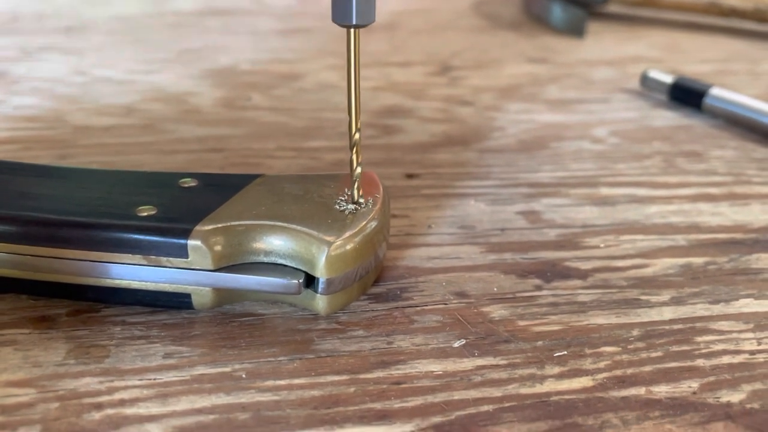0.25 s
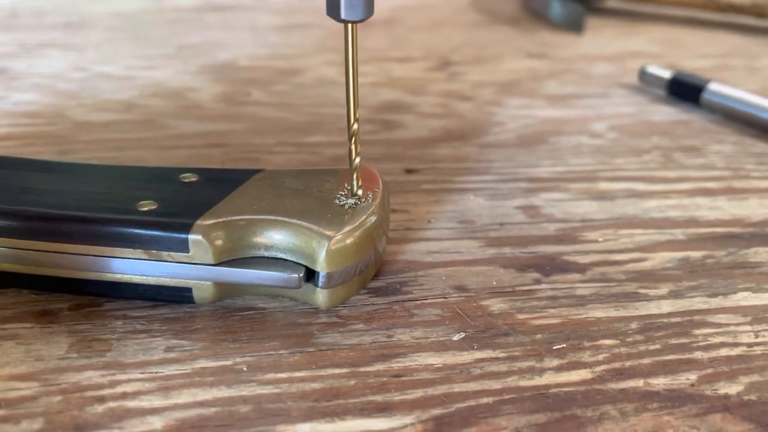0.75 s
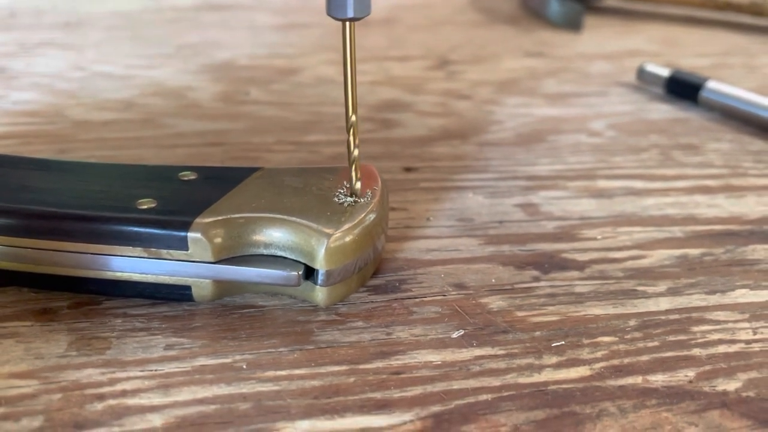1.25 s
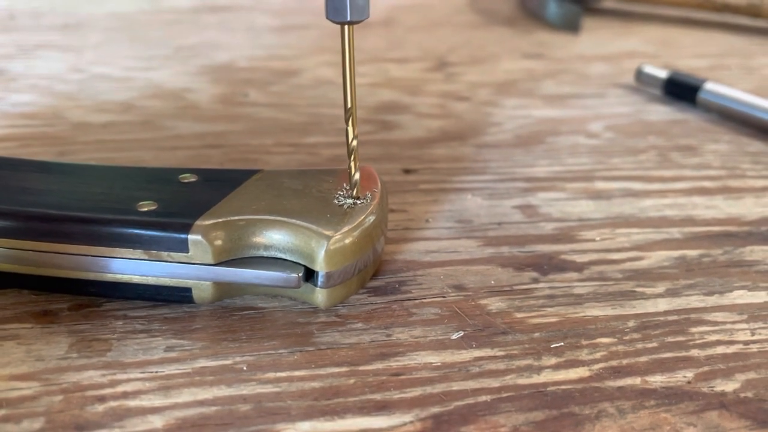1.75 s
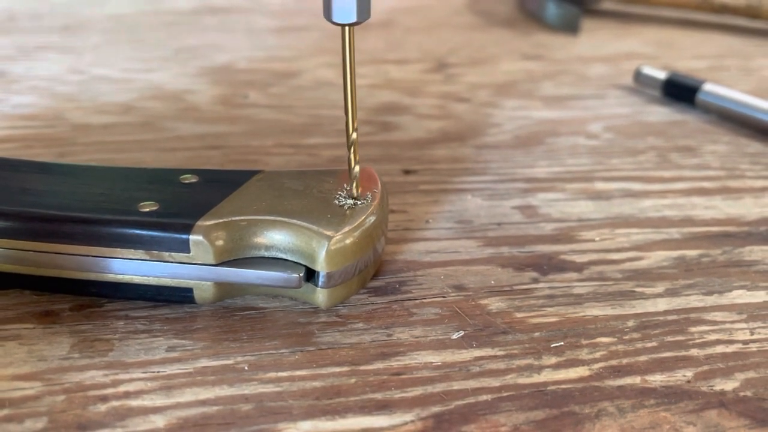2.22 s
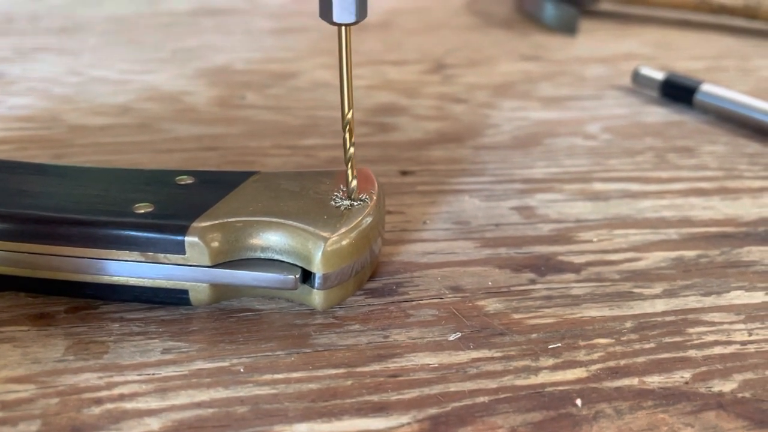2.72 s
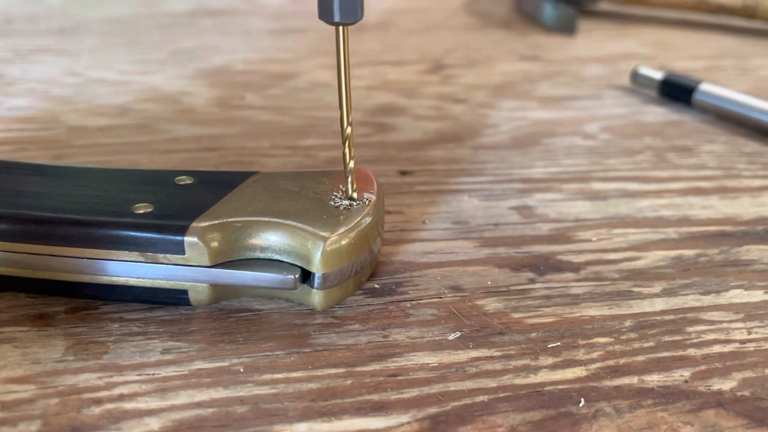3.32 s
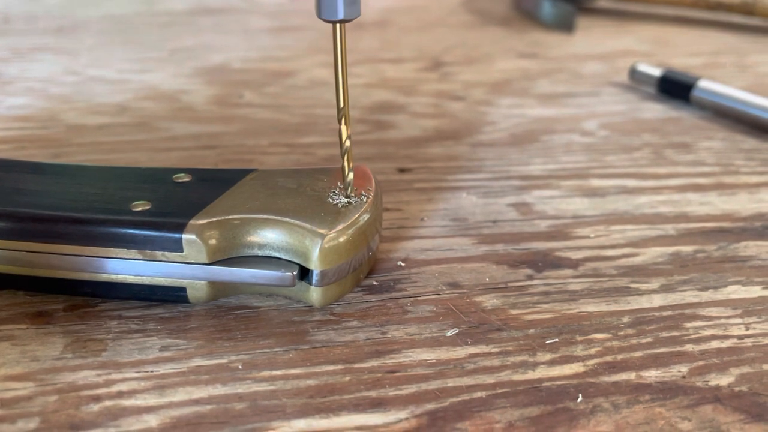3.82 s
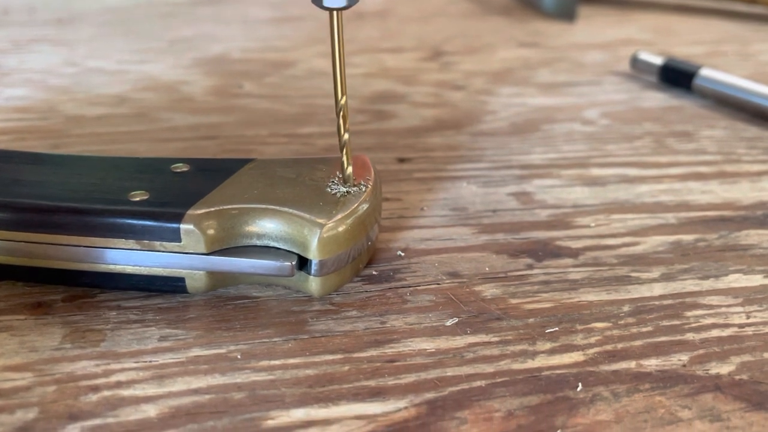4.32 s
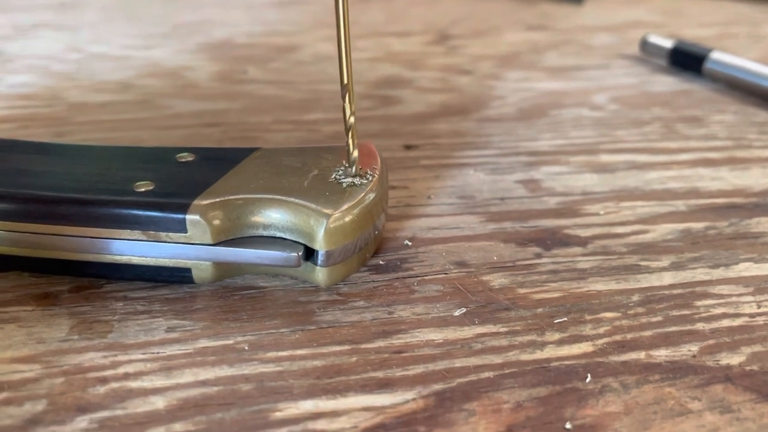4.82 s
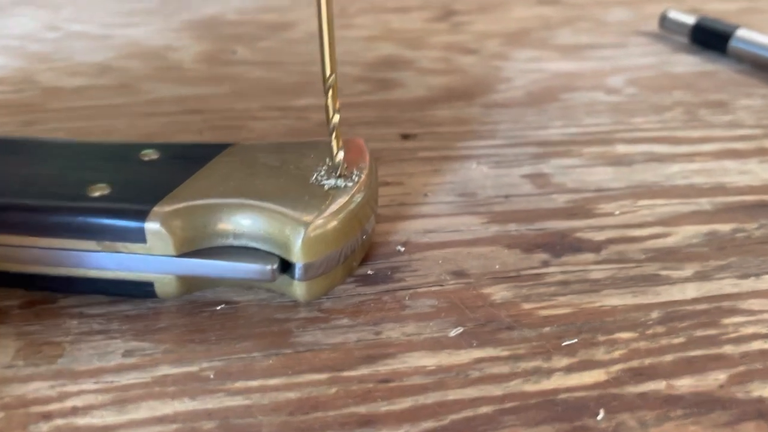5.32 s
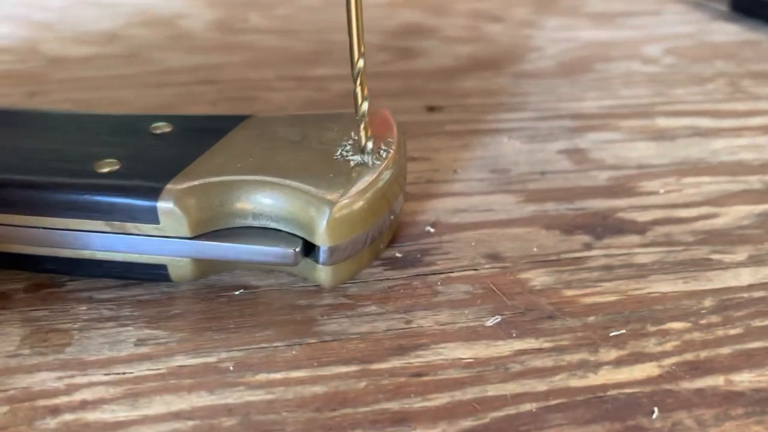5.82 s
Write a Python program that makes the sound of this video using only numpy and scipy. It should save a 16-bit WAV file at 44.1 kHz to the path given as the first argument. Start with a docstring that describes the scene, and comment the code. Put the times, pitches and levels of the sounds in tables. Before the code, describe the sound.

Heard very close in a small, quiet room, a handheld electric drill cuts metal in bursts of about half a second to a second. The whine swoops up, gear teeth rattle, and the bit rasps with short shuddering surges; then the pitch drops quickly and the clatter breaks into ticks. Faint room hum fills the gaps, with occasional bright chip snaps, soft knocks and tiny halting squeaks. The last pull is short.

```python
"""A cordless drill, already running, bores a thin bit into the brass end of a folding knife on a wooden bench.
It coasts down, then five more short pulls follow: the speed control whistles and the motor winds up,
its hum and gear tones climbing through clattering teeth while the bit scrapes and shudders in surges.
Let go, the motor brakes evenly to a stop; a few halts squeak, and now and then a chip snaps or the drive knocks.
Shaped noise and two low tones hold a small quiet room beneath it all, heard at two close microphone ports."""
import sys
import numpy as np
from scipy import signal
from scipy.fft import rfft, irfft, next_fast_len
from scipy.io import wavfile
from scipy.ndimage import uniform_filter1d

SR = 44100
rng = np.random.default_rng(int(sys.argv[2]) if len(sys.argv) > 2 else 0)


def master_out(mix):
    """Clip the mix to full scale and print it as 16-bit PCM to the path in sys.argv[1]."""
    frames = np.transpose(np.atleast_2d(mix))
    ceiling = np.clip(frames, -1, 1)
    pcm = np.round(ceiling * 32767).astype(np.int16)
    wavfile.write(sys.argv[1], SR, pcm)


N = 267246
TIME = np.arange(N) / SR

# trigger pulls, the first already under way: on [t/s], off [t/s], top speed [turns per s],
# wind-up time constant [t/s], coast to rest [t/s], then base levels before speed and trims:
# rattle [level/dB], scrape [level/dB], hum lift [level/dB], whistle [level/dB], whistle left over right [level/dB]
TRIGGER_PULLS = [ (-1.0, .068, 206, .17, .295, -31.2, -42.5, 3, -40, 1),
                 (.694, 1.38, 202.5, .15, .297, -31.3, -41.5, 0, -39, 0),
                 (1.858, 2.433, 199, .174, .255, -30.9, -41.7, 1, -39.5, -1),
                 (2.886, 3.866, 193.5, .157, .263, -31, -41.7, 0, -41, -2),
                 (4.233, 4.924, 191, .153, .26, -31, -42.3, 1.5, -40.5, -.5),
                 (5.649, 6.07, 201, .181, .26, -31, -42.4, 2.5, -38, 6)]
# motor and gear tones, before the housing: multiple of motor speed, level relative to the rattle gain [level/dB]
GEAR_TONES = [(1, -15), (3, -9), (4, -8), (6, -3.2), (8, -11), (9, -6), (12, -7.5), (15, -5.5), (20, -11)]
# swell of the motor hum through the drill body's resonances: pitch [f/Hz], level before each pull's lift [level/dB]
HUM_SWELL = [(100, -66), (220, -60), (260, -44), (295, -50), (330, -33.5), (355, -38), (375, -35.5),
             (392, -39.5), (415, -32)]
# broad colour of drill, knife and bench: [f/Hz], relative [level/dB]
BODY_COLOUR = [(40, -33), (90, -13.5), (140, -4.5), (250, -13), (450, -1.5), (1000, -2.5), (1900, 1),
               (2700, -4.2), (3200, -12), (5500, -19), (7500, -16), (11000, -18), (15000, -32)]
# resonances of drill, knife and bench: centre [f/Hz], width [f/Hz], lift [level/dB]
BODY_MODES = [(196.2, 21.3, 13), (262, 42.6, 18), (325.8, 93, 13), (407, 90, 8), (493, 35, 5.5),
              (553.6, 138, 6.5), (716, 129, 5), (871, 256, 7), (1185, 67, 5.5), (1570, 202, 7.7),
              (1728, 154, 5), (2496, 122, 5), (2812, 110, 5), (3505, 360, 5.5), (4696, 190, 7),
              (5200, 300, 2.5), (6500, 2700, 6.3)]
# surges of chatter near the bit's bending resonance, several as a gear tone sweeps through it:
# middle [t/s], pitch [f/Hz], rms at the top before the trim [level/dB]
CHATTER_SURGES = [(1.36, 1607, -30.4), (2.21, 1625, -27.5), (2.359, 1610, -30.2), (3.2, 1580, -26.5),
                  (3.595, 1689, -28), (4.329, 1569, -26.5), (4.904, 1556, -29), (5.94, 1600, -29.1)]
# squeaks of the halting bit: start [t/s], length [t/s], start, middle and end pitch [f/Hz], fundamental [level/dB]
HALT_SQUEAKS = [(0.317, 0.025, 4900, 5130, 4900, -54), (1.623, 0.025, 4800, 5470, 5050, -60.5),
                (4.068, .016, 7095, 6900, 6400, -58)]
# chips snapping: [t/s], burst before filter and trim [level/dB]
CHIP_SNAPS = [(1.519, -12.5), (2.362, -35), (2.368, -24.5), (2.548, -38), (3.97, -34.5), (3.993, -17),
              (5.917, -20)]
# light knocks of the loose drive: [t/s], burst before housing, filter and trim [level/dB]
DRIVE_KNOCKS = [(.374, -32), (.69, -21), (5.272, -29), (5.507, -42), (5.626, -26)]
# overtones of the whistle: multiple, relative [level/dB]
WHISTLE_OVERTONES = [(1, -3), (2, -21), (3, -34.5)]
# phase lead of the left port over the right: [f/Hz], [radians]
PORT_LEAD = [(250, 0), (500, -.6), (850, -1.5), (1250, -.3), (1600, -1.4), (1950, -3.1), (2250, -5.8),
             (2950, -6.5), (3100, -7.9), (3600, -5.5), (5200, -6.2), (6100, -3.6), (6900, -5.4),
             (8400, -3.1), (10600, 0), (12700, 3.1), (15000, 6.3)]
# left port over right: [f/Hz], [level/dB]
PORT_BALANCE = [(130, 2.5), (350, 2), (560, 2.5), (720, -4.5), (1150, -1.5), (1500, 2.5), (1750, 4.5),
                (2150, 1), (2900, 5), (3300, -7.5), (4100, 0.5), (5400, 3.5), (6200, -2.5), (10000, 0)]
# room decay: [f/Hz], time to fall 60 dB [t/s]
ROOM_DECAY = [(150, 0.56), (1000, 0.27), (5000, 0.12), (14000, 0.089)]
# colour of the room rumble: [f/Hz], relative density [level/dB]
RUMBLE_COLOUR = [(25, -13), (55, -2), (80, -1), (125, -1.5), (250, -5.5), (470, -14), (700, -20.5),
                 (1000, -28), (1600, -32), (2400, -41), (4000, -42.5), (6000, -45.5), (10000, -59),
                 (15000, -58.5)]
# wavering low room hum, before the left-right tilt: [f/Hz], rms [level/dB]
ROOM_HUM = [(59.2, -64.5), (118.4, -58.5)]

# the starting current kicks the motor towards KICK_SPEED (turns per s) with time constant KICK_S (s)
KICK_SPEED, KICK_S = 80, .015
# turns per s: reference for level; coasting gears go slack below the second; the bit sticks at the third
FULL_SPEED, SLACK_SPEED, HALT_SPEED = 200, 104, 28
# fall of level for each turn per s below SLACK_SPEED (dB)
RATTLE_SLACK_DB, SCRAPE_SLACK_DB = .29, .31
# rise of level for each doubling of speed (dB)
RATTLE_SPEED_DB, SCRAPE_SPEED_DB = 2.5, 4.0
# the gears take up their play in TAKE_UP_S (s), starting from these offsets (dB)
TAKE_UP_S, RATTLE_START_DB, SCRAPE_START_DB = .022, -15, -8
COAST_DB = -1.6  # the scrape eases while the motor coasts
BIT_HZ, BIT_WIDTH_HZ = 1600, 70  # bending resonance of the bit
SWITCH_HZ = 4001.4  # chopping rate of the speed control
WHISTLE_RISE_S = .007  # the whistle swells in as the current builds
RUMBLE_DB = -55  # rms of the rumble before the left-right tilt
CUTOFF_HZ = 15800


def amp(db):
    """Decibels to gain."""
    return 10 ** (np.asarray(db) / 20)


def unit(x):
    """Scales to rms 1."""
    return x / np.sqrt(np.mean(x ** 2) + 1e-20)


def read(points, hz):
    """Reads (Hz, value) points on a log-frequency axis."""
    f, value = np.transpose(points)
    return np.interp(np.log(hz + 1), np.log(f + 1), value)


def add(mix, s, sound):
    """Mixes a sound in at time s."""
    part = mix[max(round(s * SR), 0):][:len(sound)]
    part += sound[:len(part)]


def band(x, lo_hz, hi_hz, order=3):
    """Band-pass filter."""
    sos = signal.butter(order, [lo_hz, min(hi_hz, SR / 2 - 1)], "band", fs=SR, output="sos")
    return signal.sosfilt(sos, x)


def wander(rate_hz):
    """Smooth random drift of rms 1, mostly slower than the given rate."""
    hz = np.fft.rfftfreq(N, 1 / SR)
    spectrum = rfft(rng.standard_normal(N)) * np.exp(-(hz / rate_hz) ** 2)
    return unit(irfft(spectrum, N))


def motion(flutter=.003):
    """Motor speed, turns so far and layer gains: each pull winds up, then friction brakes evenly."""
    speed = np.full(N, float(HALT_SPEED))
    rattle_gain, scrape_gain, hum_gain = np.zeros((3, N))
    for on, off, top, wind_s, coast_s, rattle_db, scrape_db, hum_db, *_ in TRIGGER_PULLS:
        held_s = np.clip(TIME - on, 0, off - on)
        coasted = np.clip((TIME - off) / coast_s, 0, 1)
        kick_left = KICK_SPEED * np.exp(-held_s / KICK_S)
        climb_left = (top - KICK_SPEED) * np.exp(-held_s / wind_s)
        now = np.maximum((top - kick_left - climb_left) * (1 - coasted), HALT_SPEED)
        coasting = TIME >= off
        turning = (TIME >= on) & (~coasting | (now > HALT_SPEED))
        gate = uniform_filter1d(turning.astype(float), size=200)

        octaves = np.log2(now / FULL_SPEED)
        play = np.maximum(1 - held_s / TAKE_UP_S, 0)
        slack = coasting * np.maximum(SLACK_SPEED - now, 0)
        rattle_db = rattle_db + RATTLE_SPEED_DB * octaves + RATTLE_START_DB * play - RATTLE_SLACK_DB * slack
        scrape_db = scrape_db + SCRAPE_SPEED_DB * octaves + SCRAPE_START_DB * play - SCRAPE_SLACK_DB * slack
        rattle_gain += gate * amp(rattle_db)
        scrape_gain += gate * amp(scrape_db + COAST_DB * coasting)
        hum_gain += gate * amp(hum_db + read(HUM_SWELL, 2 * now))
        speed = np.where(turning, now, speed)
    turns = np.cumsum(speed * (1 + flutter * wander(rate_hz=40))) / SR  # the uneven cut shakes the speed
    return speed, turns, rattle_gain, scrape_gain, hum_gain


def housing(x, size=8192):
    """Rings a force through the resonances of drill, knife and bench; the strongest has gain 1."""
    hz = abs(np.fft.fftfreq(size, 1 / SR))
    db = read(BODY_COLOUR, hz)
    for f, width, lift in BODY_MODES:
        db = db + lift * np.exp(-(2 * (hz - f) / width) ** 2)
    log_gain = np.log(amp(db - db.max()))
    # minimum phase: the ring starts at once
    ring = np.fft.ifft(np.exp(np.conj(signal.hilbert(log_gain)))).real
    return signal.oaconvolve(np.atleast_2d(x), ring[None, :size // 2], axes=1)[:, :N]


def whine(speed, turns, gain, hum_gain, torque_db=2, coasting_db=-4, slack=0.05, waver_db=3.5):
    """The motor hums twice a turn; the gears sing while driven, most under the high torque of winding up."""
    driven = sum((TIME >= on) & (TIME < off) for on, off, *_ in TRIGGER_PULLS)
    driven = uniform_filter1d(driven.astype(float), size=2000)
    torque = driven * np.minimum(1 - speed / speed.max(), 1 / 3)
    tones = 0
    for multiple, db in GEAR_TONES:
        play = slack * multiple * wander(rate_hz=57)  # play in the gears blurs the higher tones
        level = amp(db + waver_db * wander(rate_hz=16.8))
        tones = tones + level * np.sin(2 * np.pi * round(multiple) * turns + play)
    tones = tones * amp(torque_db * torque + coasting_db * (1 - driven))
    hum = hum_gain * np.sin(2 * np.pi * 2 * turns)
    return np.sqrt(2) * (housing(gain * tones) + hum)


def impacts(speed, turns, decay_s, uneven_db, steady):
    """Bursts of noise two and three times a turn over steady rubbing; they part into ticks at low speed."""
    force = steady
    for per_turn in range(2, 4):
        tooth, part = np.divmod(per_turn * turns, 1)
        strength = amp(uneven_db * np.tanh(rng.standard_normal(N)))[tooth.astype(int)]
        since_s = part / (per_turn * speed)
        force = force + strength * np.exp(-since_s / decay_s)
    # the drill radiates from many places, so each port hears a share of its own
    noise = rng.standard_normal(N) + .38 * rng.standard_normal((2, N))
    return unit(force * noise)


def rattle(speed, turns, gain, surge_db=1.64):
    """Gear teeth clatter inside the housing, harder whenever the load surges."""
    force = impacts(speed, turns, decay_s=0.00049, uneven_db=4.4, steady=0.36)
    clatter = housing(force * amp(surge_db * wander(rate_hz=56)))
    return gain * unit(band(clatter, lo_hz=69, hi_hz=4350))


def scrape(speed, turns, gain, level_db=2.5, grab_db=2.0):
    """The cutting edges and motor brushes rasp, grabbing and letting go."""
    rasp = housing(impacts(speed, turns, decay_s=0.00086, uneven_db=2, steady=.25))
    grabbing = band(rasp, lo_hz=4360, hi_hz=17000) * amp(grab_db * wander(rate_hz=140))
    return amp(level_db) * gain * unit(grabbing)


def chatter(speed, turns, gain, level_db=-2, length_s=.05, rough=.5, sing_db=-8, waver_db=3):
    """The thin bit shudders near its bending resonance: in placed surges, and when a gear tone sweeps through."""
    out, size = np.zeros(N), round(length_s * SR)
    shake = rough * wander(rate_hz=97)  # radians
    for s, hz, db in CHATTER_SURGES:
        phase = 2 * np.pi * hz * TIME[:size] + np.roll(shake, -round(s * SR))[:size]
        surge = np.hanning(size) * np.sin(phase)
        add(out, s - length_s / 2, np.sqrt(2) * amp(db + level_db) * surge)
    for multiple in range(8, 10):
        in_tune = 1 / (1 + (2 * (multiple * speed - BIT_HZ) / BIT_WIDTH_HZ) ** 2)
        level = gain * in_tune * amp(sing_db + waver_db * wander(rate_hz=20))
        out += level * np.sin(2 * np.pi * multiple * turns + shake)
    return out


def squeaks(overtone_db=-7):
    """The bit sticks and slips in its hole with a short arched pitch."""
    out = np.zeros(N)
    for s, length, start, middle, end, db in HALT_SQUEAKS:
        u = np.linspace(0, 1, round(length * SR))
        hz = np.polyval(np.polyfit([0, .5, 1], [start, middle, end], 2), u)
        phase = 2 * np.pi * np.cumsum(hz) / SR
        tone = sum(amp(overtone_db * k) * np.sin((k + 1) * phase) for k in range(3))
        add(out, s, amp(db) * tone * signal.windows.tukey(len(u), .5))
    return out


def bursts(rows, decay_s):
    """A short dying burst of noise for each row, scaled to equal energy before its level."""
    t, out = TIME[:SR // 10], np.zeros(N)
    for s, db in rows:
        burst = rng.standard_normal(len(t)) * np.exp(-t / decay_s)
        add(out, s, amp(db) * burst / np.linalg.norm(burst))
    return out


def clicks(chip_db=2, knock_db=20):
    """Chips snap brightly; knocks ring the housing."""
    chips = band(bursts(CHIP_SNAPS, decay_s=.0012), lo_hz=5500, hi_hz=12500, order=2)
    knocks = band(housing(bursts(DRIVE_KNOCKS, decay_s=0.0066)), lo_hz=450, hi_hz=9000, order=1)
    return amp(chip_db) * chips + amp(knock_db) * knocks


def whistle(lead=0.85, waver_db=-0.66):
    """The speed control chops the current at a fixed rate for as long as the trigger is held."""
    level = np.zeros((2, N))
    for on, off, *_, db, pan_db in TRIGGER_PULLS:
        held = uniform_filter1d(((TIME >= on) & (TIME < off)).astype(float), size=100)
        held = held * np.clip((TIME - on) / WHISTLE_RISE_S, 0, 1) ** 2
        level += held * amp([[db + pan_db / 2], [db - pan_db / 2]])
    phase = 2 * np.pi * SWITCH_HZ * TIME + np.array([[lead], [0]])  # the left port leads, in radians
    tone = 0
    for multiple, db in WHISTLE_OVERTONES:
        tone = tone + amp(db + waver_db * wander(rate_hz=15)) * np.sin(round(multiple) * phase)
    return np.sqrt(2) * level * tone


def ports(x):
    """The sound reaches the two ports with different level and phase."""
    size = next_fast_len(N + SR)
    hz = np.fft.rfftfreq(size, 1 / SR)
    # half of the difference goes to each port, in opposite directions
    half = amp(read(PORT_BALANCE, hz) / 2) * np.exp(.5j * read(PORT_LEAD, hz))
    return irfft(rfft(x, size) * np.array([half, 1 / half]), size)[:, :N]


def room(x, size=256):
    """A diffuse tail for each port, each band dying at its own speed."""
    hz, t, z = signal.stft(rng.standard_normal((2, SR // 2)), SR, nperseg=size)
    decay = amp(-60 * t / read(ROOM_DECAY, hz)[:, None])
    tail = signal.istft(z * decay, SR, nperseg=size)[1]
    tail /= np.linalg.norm(tail, axis=1, keepdims=True)
    return signal.fftconvolve(band(x, lo_hz=494, hi_hz=16000, order=1), tail, axes=1)[:, :N]


def rumble(left_db=2.0, waver_db=2):
    """Low room noise and a wavering hum, mostly shared by both ports and stronger on the left."""
    colour = amp(read(RUMBLE_COLOUR, np.fft.rfftfreq(N, 1 / SR)))
    mid, side = (amp(RUMBLE_DB) * unit(irfft(rfft(rng.standard_normal(N)) * colour, N)) for _ in range(2))
    for hz, db in ROOM_HUM:
        hum = amp(waver_db * wander(rate_hz=6.9)) * np.sin(2 * np.pi * hz * TIME)
        mid = mid + amp(db) * unit(hum)
    pair = np.array([mid + .35 * side, mid - .35 * side])
    return amp([[left_db], [-left_db]]) * pair


def scene(room_db=-12):
    """The drill close by, its reflections and the room's rumble."""
    speed, turns, rattle_gain, scrape_gain, hum_gain = motion()
    drive = whine(speed, turns, rattle_gain, hum_gain) + rattle(speed, turns, rattle_gain)
    bit = scrape(speed, turns, scrape_gain) + chatter(speed, turns, rattle_gain) + squeaks()
    drill = drive + bit + clicks()
    return ports(drill) + whistle() + amp(room_db) * room(drill) + rumble()


def record(dry):
    """A steep low-pass closes off the top of the band."""
    edge = signal.firwin(511, CUTOFF_HZ, window=("kaiser", 9), fs=SR)
    return signal.oaconvolve(dry, edge[None], "same")


dry = scene()
out = record(dry)
master_out(out)
```